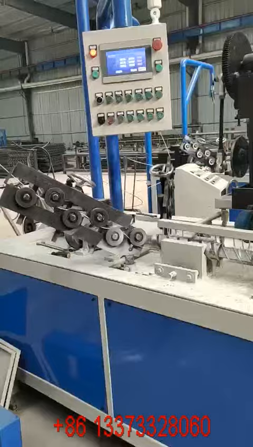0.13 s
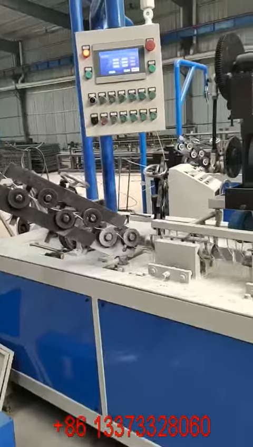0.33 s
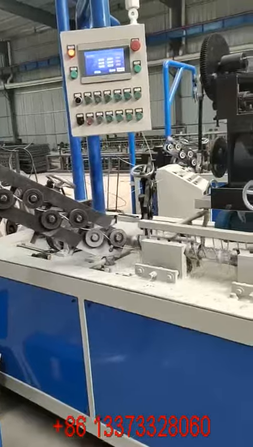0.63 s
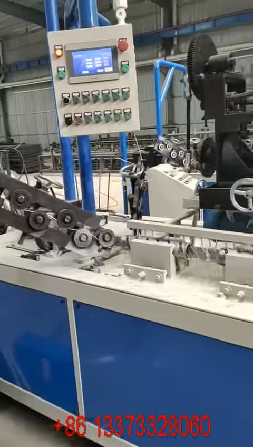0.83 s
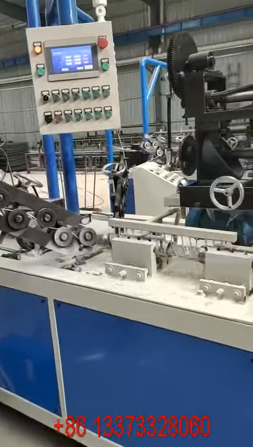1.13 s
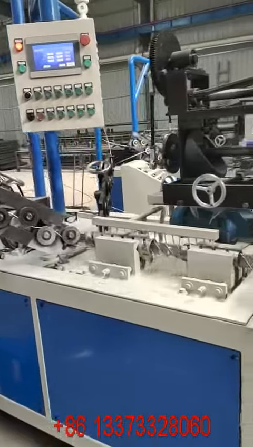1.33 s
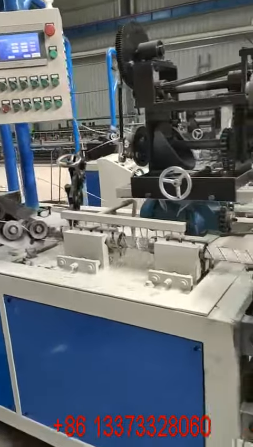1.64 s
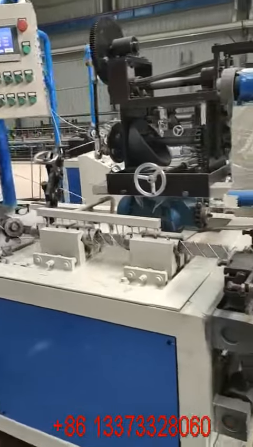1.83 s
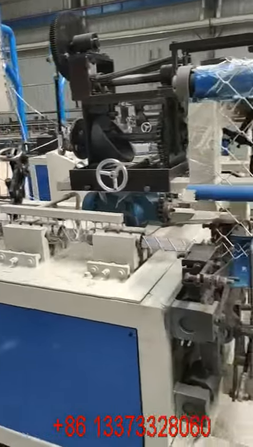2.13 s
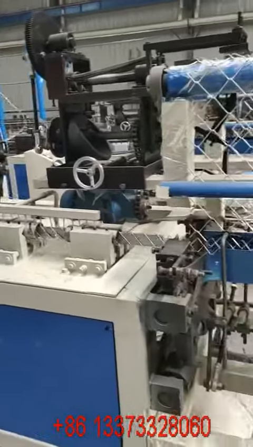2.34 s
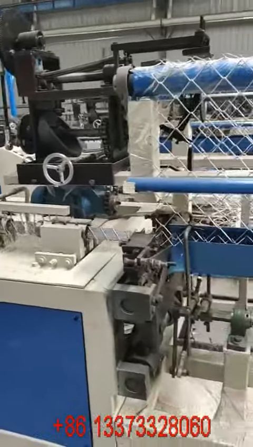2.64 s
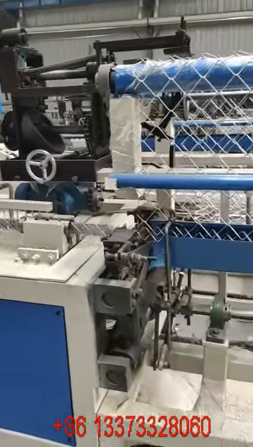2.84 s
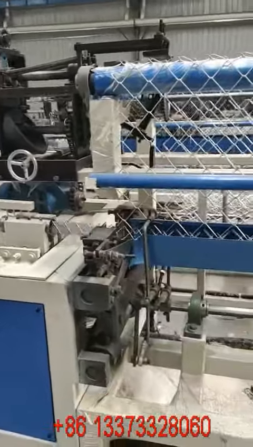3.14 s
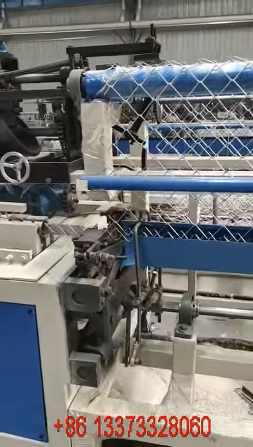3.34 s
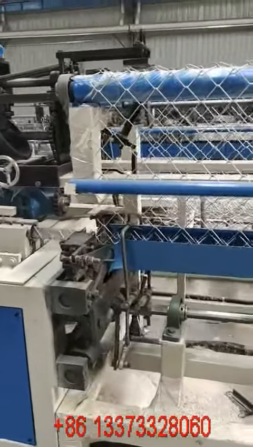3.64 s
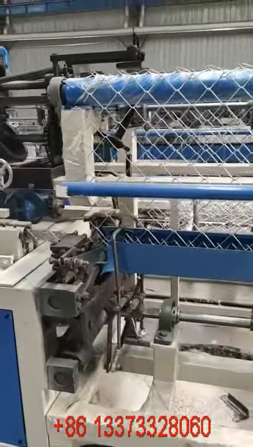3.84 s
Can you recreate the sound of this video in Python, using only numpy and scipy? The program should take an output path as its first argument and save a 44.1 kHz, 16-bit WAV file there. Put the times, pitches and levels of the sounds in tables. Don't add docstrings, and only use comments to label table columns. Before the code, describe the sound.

A wire mesh machine fades in over the first second, then slaps steel on wire about six times a second, with rebound ticks, frame thuds and motor drone, heard close in a reverberant factory hall.

```python
import sys
import numpy as np
from scipy import signal
from scipy.fft import rfft, irfft
from scipy.io import wavfile
from scipy.ndimage import uniform_filter1d

SR = 44100
rng = np.random.default_rng(int(sys.argv[2]) if len(sys.argv) > 2 else 0)


def digitize_waveform(pressure):
    field = np.atleast_2d(pressure).T
    bounded = np.clip(field, -1, 1)
    quanta = np.round(bounded * 32767).astype(np.int16)
    wavfile.write(sys.argv[1], SR, quanta)


def rack_gain(trim_db):
    fader = np.asarray(trim_db, float)
    return 10 ** (fader / 20)


N = 176400
PORT_GAP_SAMPLES = 5


def evened(x):
    return x / np.sqrt(np.mean(x ** 2) + 1e-20)


def read(points, hz):
    f, value = np.transpose(points)
    return np.interp(np.log(hz + 1), np.log(f + 1), value)


def add(mix, start_s, sound):
    part = mix[..., round(start_s * SR):][..., :sound.shape[-1]]
    part += sound[..., :part.shape[-1]]


def shaped(x, points):
    n = x.shape[-1]
    return irfft(rfft(x) * rack_gain(read(points, np.fft.rfftfreq(n, 1 / SR))), n)


def smoothed(x, size):
    return uniform_filter1d(uniform_filter1d(x, size=size), size=size)


def fade(t):
    fade_s, power = 0.99, 1.53
    return np.clip(t / fade_s, 1e-3, 1) ** power


def whistle(noise_spectrum, hz, width_hz):
    off = (np.fft.rfftfreq(N, 1 / SR) - hz) / (width_hz / 2)
    return evened(irfft(noise_spectrum / (1 + off ** 2), N))


def drone():
    # frequency in Hz, level in dB per Hz.
    broad = [(30, -7), (70, 1), (201, 9.5), (1100, 7), (3050, 1.5), (3450, -7.5), (9970, -18.5),
             (15500, -2.5)]
    # frequency in Hz, coherence (0-1).
    likeness = [(35, .6), (100, 1), (250, 0.93), (600, 0.63), (1200, 0.033), (3000, 0.5), (8000, 0.022)]
    # frequency in Hz, width in Hz, level in dB.
    casings = [(102.5, 11, -49), (206, 17, -39), (248, 6.7, -50.5), (497, 160, -38), (696, 10, -62),
               (1454, 23, -48), (1667, 23, -49.5), (2080, 14, -51), (2530, 69, -67)]
    # time in s, level in dB.
    whine = [
        (.6, -55),
        (1.1, -34),
        (2.0, -33.5),
        (3.0, -33.5),
        (3.15, -34),
        (4.0, -41),
    ]
    broad_db, patch_db = -24.5, 1.8
    gear_hz, gear_width_hz, gear_waver_hz = 1001, 14, 2.5
    gear_db, gear_fuzz_db = -5.5, -5

    frames, hz = N // 256 + 5, np.fft.rfftfreq(1024, 1 / SR)
    a, b, c, d, patches = rng.standard_normal((frames, 513, 5)).T
    patches = uniform_filter1d(patches, size=10, axis=0)
    patches = evened(uniform_filter1d(patches, size=8, axis=1))
    same = np.clip(read(likeness, hz), -1, 1)[:, None]
    left = a + 1j * b
    right = same * left + np.sqrt(1 - same ** 2) * (c + 1j * d)
    spectra = np.array([left, right]) * rack_gain(read(broad, hz)[:, None] + patch_db * patches)
    wide = signal.istft(spectra, nperseg=1024, noverlap=768)[1][:, :N]

    noise = rng.standard_normal((3, N))
    noise = rfft(noise[0] + 0.033 * noise[1:])
    casing = sum(rack_gain(db) * whistle(noise, f_hz, 1.6 * width_hz) for f_hz, width_hz, db in casings)

    waver = evened(smoothed(rng.standard_normal(N), 6000))
    phase = 2 * np.pi * np.cumsum(gear_hz + gear_waver_hz * waver) / SR
    gear = np.sin(phase) * np.sqrt(2) + rack_gain(gear_fuzz_db) * whistle(noise, gear_hz, gear_width_hz)
    gear_gain = rack_gain(gear_db + np.interp(np.arange(N) / SR, *np.transpose(whine)))
    return rack_gain(broad_db) * evened(wide) + casing + gear * gear_gain


def rattle():
    rattle_db, ticks_per_s, spread_db = -39, 640, 5
    size = rack_gain(spread_db * np.minimum(rng.exponential(1, N), 5)) * (rng.random(N) < ticks_per_s / SR)
    link, t = rng.integers(0, 24, N), np.arange(600) / SR
    out = np.zeros((2, N))
    for k, hz in enumerate(np.geomspace(1200, 15000, num=24)):
        tick = np.sin(2 * np.pi * hz * t) * np.exp(-t * hz / 2.2)
        out[k % 2] += signal.oaconvolve(size * (link == k), tick)[:N]
    return rack_gain(rattle_db) * evened(out + 0.088 * out[::-1])


def ringing(modes, t, spread_db):
    draw = rng.standard_normal((len(modes), 2))
    out = 0
    for (hz, db, t60_s), (a, b) in zip(modes, draw):
        decay = rack_gain(db + spread_db * a - 60 * t / max(t60_s, .005))
        out = out + decay * np.sin(2 * np.pi * hz * (1 + 0.014 * b) * t)
    return out


def blows(t, length_s):
    bounces_per_s, bounce_share = 1500, .45
    hits = rng.standard_normal(len(t)) * (rng.random(len(t)) < bounces_per_s / SR)
    return hits * bounce_share * np.exp(-t / max(length_s, .001)) + (t == 0)


def clack(start_s, db, ring_hz, rattle_s, sharp_db):
    # frequency in Hz, level in dB, t60 in s.
    blade_modes = [(1510, -7.5, 0.2), (1776, 0.5, 0.041), (2400, -24, 0.012), (3023, 10, 0.047),
                   (3570, -3, 0.017), (4680, 5, 0.038), (5140, -24, 0.007), (5960, 14, 0.025),
                   (6280, -31, 0.034), (7860, 4, 0.031), (8200, -12, 0.04), (10600, -10, 0.016)]
    # frequency in Hz, level in dB per Hz.
    snap_colour = [(700, -18), (1100, -18), (1800, 1.5), (3600, -1), (4500, 1), (6200, 1), (10500, -9),
                   (15500, -6.5)]
    modes_db, ring_db, ring_t60_s = -21, -17.5, 0.065
    snap_db, snap_shared, ragged_db = -11, 0.36, 3
    crack_db, crack_s, crack_peak_db, crack_width_hz = 12, .002, 19.5, 230
    crack_low_hz, crack_treble_hz = 2480, 9000
    shock_db, ring_in_hall = 15, .12

    t, hz = np.arange(6144) / SR, np.fft.rfftfreq(6144, 1 / SR)
    body = rack_gain(modes_db) * ringing(blade_modes, t, 4.0) / 2
    body = body + rack_gain(ring_db) * ringing([(ring_hz, 0, ring_t60_s)], t, 0)
    hits = blows(t, crack_s)
    rung = 2.12 * rack_gain(sharp_db) * signal.fftconvolve(hits / np.linalg.norm(hits), body)[:len(t)]

    noise = rng.standard_normal((3, len(t)))
    hiss = evened(shaped(noise[1:] + snap_shared * noise[0], snap_colour))
    ragged = rack_gain(ragged_db * evened(smoothed(noise[0], 150)))
    peak = 1 + rack_gain(crack_peak_db) / (1 + ((hz - ring_hz) / crack_width_hz * 2) ** 2)
    peak = peak * hz ** 2 / (hz ** 2 + crack_low_hz ** 2) * (1 + (hz / crack_treble_hz) ** 2)
    crack = evened(irfft(rfft(hiss) * peak, len(t))) * np.exp(-t / crack_s) * np.minimum(t / 0.00063, 1)
    wire = hiss * ragged * np.exp(-(t / max(rattle_s, .002)) ** 2.16) * np.minimum(t / 0.0037, 1)
    snap = rack_gain(snap_db) * (rack_gain(crack_db + sharp_db) * crack + wire)

    shock = shaped(1. * (np.arange(len(t)) == 40), snap_colour)
    shock = rack_gain(shock_db) * shock / np.linalg.norm(shock) + ring_in_hall * rung
    ports = [rung + snap[0], np.roll(rung, PORT_GAP_SAMPLES) + snap[1]]
    return start_s, rack_gain(db) / fade(start_s) * np.array([*ports, shock])


def rebound(start_s, db, ring_hz):
    rebound_db, tick_s, ring_t60_s, ring_db, shock_db = -6, 0.0036, 0.06, -1, 8.5
    t = np.arange(3072) / SR
    colour = [(ring_hz * 0.27, -14), (ring_hz, 0), (ring_hz * 2.3, -7), (16000, -14)]  # Hz, dB
    tick = evened(shaped(rng.standard_normal((2, len(t))), colour))
    tick = tick * np.exp(-t / tick_s) * np.minimum(t / 0.00079, 1)
    ring = rack_gain(ring_db) * ringing([(ring_hz, 0, ring_t60_s)], t, 0) * np.minimum(t / .001, 1)
    left, right = tick[0] + ring, tick[1] + np.roll(ring, PORT_GAP_SAMPLES)
    shock = rack_gain(shock_db) * left / np.linalg.norm(left)
    return start_s, rack_gain(db + rebound_db) / fade(start_s) * np.array([left, right, shock])


def thud(start_s, db, knock_hz):
    # frequency in Hz, level in dB, t60 in s.
    frame_modes = [(216, -13.5, 0.25), (233.6, -6.5, 0.25), (400, -12.5, 0.14), (536, -2.5, 0.16),
                   (581, -6.5, 0.17), (860, 2.5, 0.046), (1040, -3, 0.037), (1300, -16, 0.033)]
    # frequency in Hz, level in dB.
    crunch_colour = [(100, -7), (250, -1), (600, -0.5), (1300, -4), (2200, -12), (5000, -20)]
    thud_db, modes_db, spread_s, knock_t60_s = -12, -5, 0.013, 0.058
    crunch_db, crunch_s, shock_db, rung_in_hall_db = -0.5, 0.03, 22, -8

    t = np.arange(8192) / SR
    body = rack_gain(modes_db) * ringing(frame_modes, t, 3.2) + ringing([(knock_hz, 0, knock_t60_s)], t, 0)
    rung = signal.fftconvolve(uniform_filter1d(blows(t, spread_s), size=8), body)[:len(t)]
    rung = rung / np.sqrt(np.mean(rung[:800] ** 2)) * np.minimum(t / 0.0016, 1)
    crunch = evened(shaped(rng.standard_normal(len(t)), crunch_colour))
    crunch = crunch * np.exp(-t / crunch_s) * np.minimum(t / 0.0051, 1)
    shock = shaped(1. * (np.arange(len(t)) == 200), crunch_colour)
    shock = rack_gain(shock_db) * shock / np.linalg.norm(shock) + rack_gain(rung_in_hall_db) * rung
    return start_s, rack_gain(db + thud_db) / fade(start_s) * np.array([rung + rack_gain(crunch_db) * crunch, shock])


def hall(x):
    # frequency in Hz, t60 in s.
    decay = [(200, 1.55), (1000, 1.64), (3500, 0.85), (9000, 1.27), (15000, 0.24)]
    tail_db, early_db, early_t60_s, wall_s = 4, -5, 0.045, .008
    out, turn = np.zeros((2, N)), np.arange(N) / SR * 2.242
    tap_s = np.arange(SR) / SR
    for k in range(3):
        taps = rng.standard_normal((2, SR)) * (rng.random((2, SR)) < .3)
        hz, t, z = signal.stft(taps, SR, nperseg=256)
        tail = signal.istft(z * rack_gain(-60 * t / read(decay, hz)[:, None]), SR, nperseg=256)[1][:, :SR]
        early = taps[::-1] * rack_gain(-60 * tap_s / early_t60_s)
        both = rack_gain(tail_db) * tail / np.linalg.norm(tail[0])
        both = both + rack_gain(early_db) * early / np.linalg.norm(early[0])
        both = both * np.minimum(tap_s / wall_s, 1) ** 2
        share = np.sqrt(2 / 3) * np.cos(np.pi * (turn + k / 3))
        out += signal.fftconvolve((x * share)[None], both, axes=1)[:, :N]
    return out


def scene():
    # start in s, level in dB, loudest ring in Hz, rattle length in s,
    # sharpness of the first crack in dB.
    clacks = [(0.158, -48, 4470, 0.04, -12), (0.229, -32, 4470, 0.033, -12),
              (0.3227, -19, 6100, 0.015, -10), (0.4913, -13.5, 6060, 0.019, -5),
              (0.6624, -17.5, 4420, 0.025, 4), (0.7295, -15, 6100, 0.028, -15),
              (0.891, -15.5, 3200, 0.051, -5), (0.965, -23, 3070, 0.028, 7),
              (1.0665, -7.5, 6020, 0.044, -5), (1.237, -8, 6280, 0.046, 2),
              (1.4036, -5.5, 5180, 0.017, -1.5), (1.5715, -8, 6200, 0.031, -1),
              (1.7447, -6, 5900, 0.013, 0), (1.9026, -6.5, 6000, 0.024, -0.5),
              (2.0745, -6.5, 4930, 0.029, -3), (2.186, -15.5, 2520, 0.022, -4),
              (2.2406, -7.5, 6280, 0.053, -1), (2.282, -16, 3100, 0.02, -1), (2.4096, -3, 5880, 0.01, -5),
              (2.576, -8.5, 4170, 0.042, 1), (2.647, -21, 2800, 0.02, 6), (2.741, -5.5, 4300, 0.051, -6),
              (2.908, -9, 4520, 0.026, 1.5), (2.929, -10.5, 4270, 0.04, 4.5),
              (3.0823, -4.5, 5930, 0.017, -2.5), (3.251, -5.5, 6280, 0.024, -1),
              (3.4155, -6.5, 4260, 0.055, 0), (3.501, -12, 5900, 0.034, -1), (3.5882, -5.5, 4440, 0.02, 6),
              (3.7592, -5.5, 4520, 0.02, -0.5), (3.928, -4, 4720, 0.023, -2.5)]
    # start in s, level in dB, ring in Hz.
    rebounds = [(0.2202, -34, 1820), (0.2654, -31, 1720), (0.312, -22.5, 1220), (0.5018, -17, 1450),
                (0.5134, -19, 5430), (0.5774, -16, 5840), (0.664, -17, 1334), (0.736, -17.5, 2350),
                (0.8001, -9, 1200), (0.8994, -23, 2730), (0.9784, -19, 1480), (1.1339, -8, 1220),
                (1.2494, -13, 5970), (1.4198, -9, 1435), (1.5886, -19, 1880), (1.613, -16.5, 1800),
                (1.759, -19, 4680), (1.9083, -12.5, 1445), (1.9694, -21, 2400), (2.0974, -16, 1740),
                (2.1194, -9.5, 3120), (2.2548, -11, 1620), (2.4226, -9, 1690), (2.5755, -16, 4450),
                (2.6407, -7.5, 2850), (2.741, -4, 4380), (2.9396, -9, 1770), (2.9574, -13, 2080),
                (3.0004, -10, 2010), (3.0924, -10, 4440), (3.0994, -10.5, 1440), (3.1127, -8, 2730),
                (3.4185, -18, 1760), (3.429, -14, 5360), (3.4404, -8, 3440), (3.4497, -19, 6000),
                (3.4604, -13, 4700), (3.5085, -4, 4930), (3.5144, -9, 2080), (3.597, -12, 2400),
                (3.6104, -9, 1527), (3.7586, -8, 1840)]
    # start in s, level in dB, knock in Hz.
    thuds = [(0.32, -20.5, 796), (0.429, -16, 597), (0.469, -17, 1040), (0.66, -19, 560), (0.767, -15, 977),
             (0.798, -13, 1242), (1.092, -7, 1040), (1.131, -8.5, 994), (1.429, -9.5, 524),
             (1.447, -12, 560), (1.505, -14, 480), (1.694, -15, 558), (1.769, -14.5, 552),
             (1.812, -14.5, 562), (1.945, -22, 400), (2.023, -12, 546), (2.094, -8.5, 1012),
             (2.3, -16.5, 974), (2.43, -9.5, 387), (2.648, -11.5, 798), (2.769, -15, 990),
             (2.988, -16.5, 623), (3.002, -22, 990), (3.1, -13.5, 520), (3.188, -15.5, 596),
             (3.428, -12.5, 1000), (3.446, -13.5, 910), (3.768, -16, 1016), (3.8, -15, 1005)]
    blade, frame = np.zeros((3, N)), np.zeros((2, N))
    for row in clacks:
        add(blade, *clack(*row))
    for row in rebounds:
        add(blade, *rebound(*row))
    for row in thuds:
        add(frame, *thud(*row))
    return blade[:2] + frame[0] + hall(blade[2] + frame[1]) + drone() + rattle()


def low_pass(x):
    return signal.sosfilt(signal.butter(12, 16820, fs=SR, output="sos"), x)


def record(dry):
    # frequency in Hz, left over right in dB.
    balance = [(60, -2), (300, 1), (600, -1.4), (2400, 2), (4400, -6), (8000, 5), (13000, -7)]
    start_s, ceiling, mic_low_hz, mono_hz, edge_hz = .1415, .8, 84.4, 260, 15660
    hz, t = np.fft.rfftfreq(N, 1 / SR), np.arange(N) / SR
    started = t > start_s
    left, right = rfft(ceiling * np.tanh(dry * fade(t) / ceiling) * started)
    mid = (left + right) / 2
    side = (left - right) / 2 * (hz / np.hypot(hz, mono_hz) + 1 / (1 + (hz / 45) ** 2))
    lean_db = read(balance, hz) / 2
    bass_cut = hz ** 2 / (hz ** 2 + mic_low_hz ** 2)
    mic = bass_cut / (1 + rack_gain(np.clip((hz - edge_hz) / 3, -200, 60)))
    ports = irfft(np.array([mid + side, mid - side]) * rack_gain(np.array([lean_db, -lean_db])) * mic, N)
    return low_pass(ports * started)


dry = scene()
out = record(dry)
digitize_waveform(out)
```